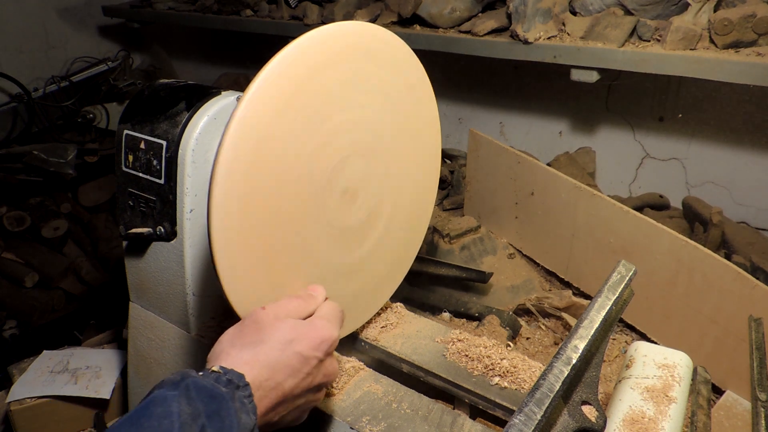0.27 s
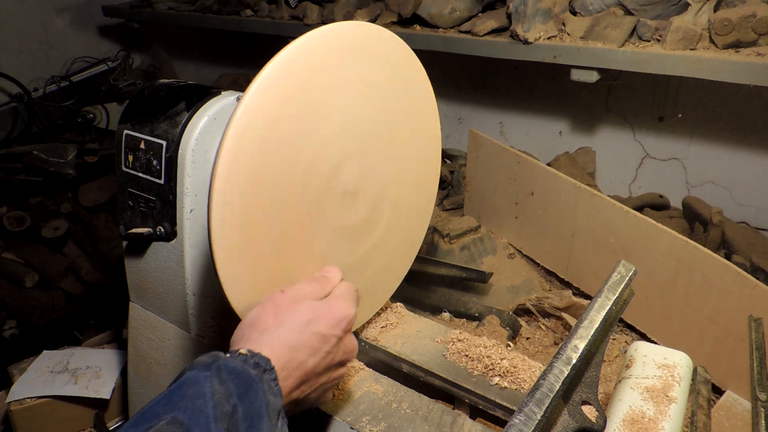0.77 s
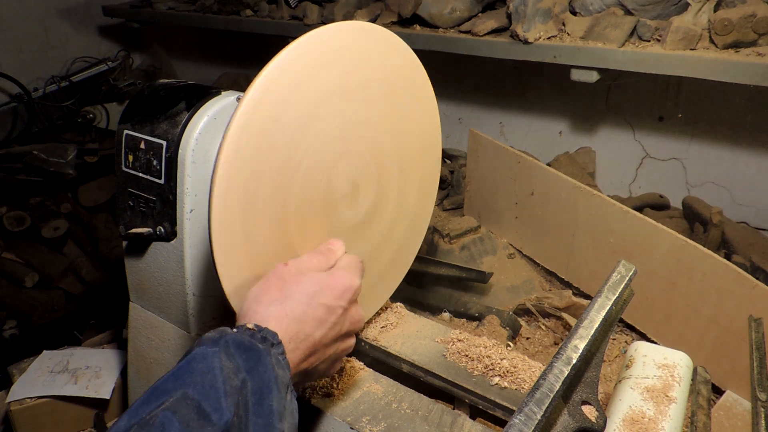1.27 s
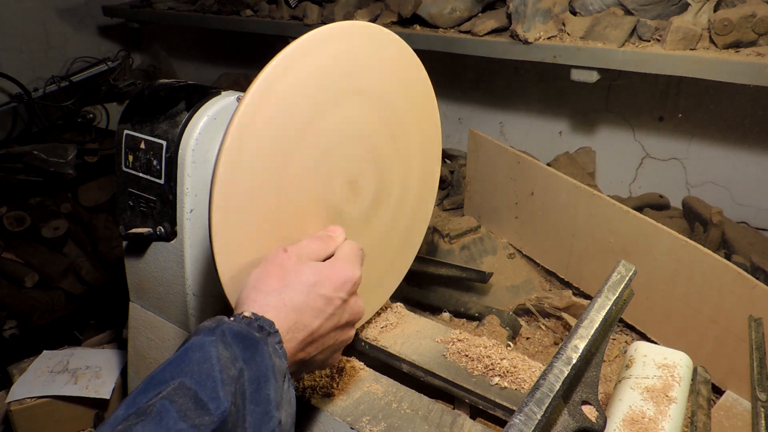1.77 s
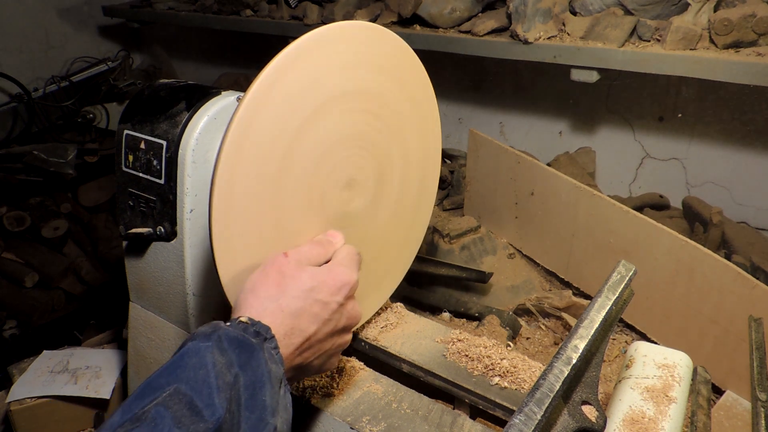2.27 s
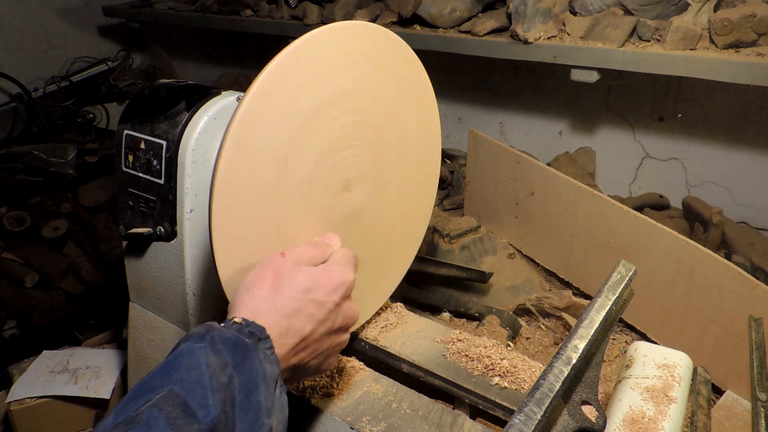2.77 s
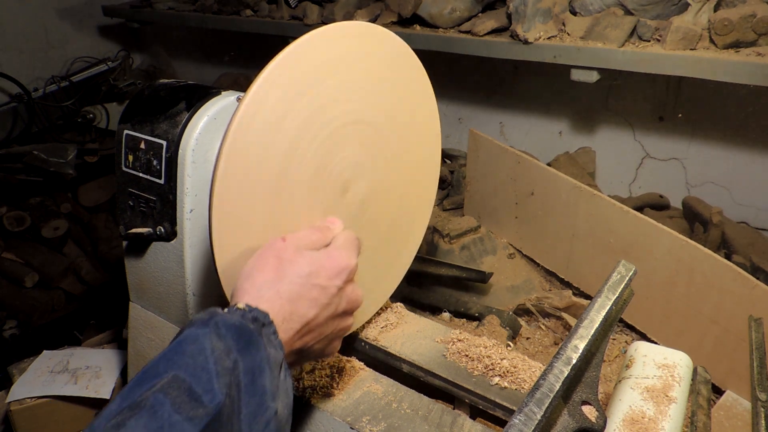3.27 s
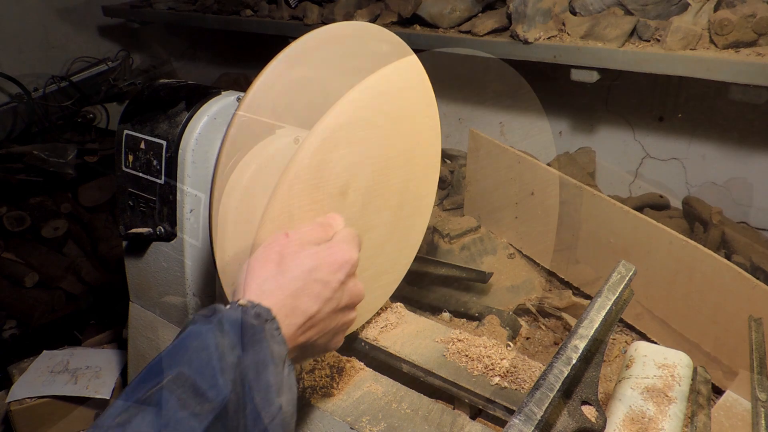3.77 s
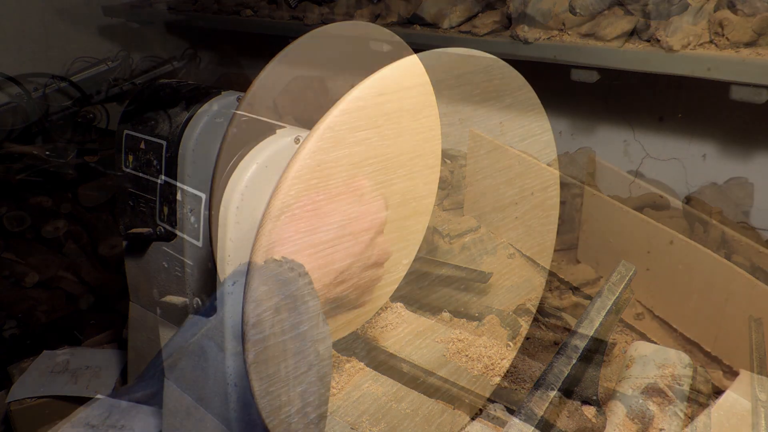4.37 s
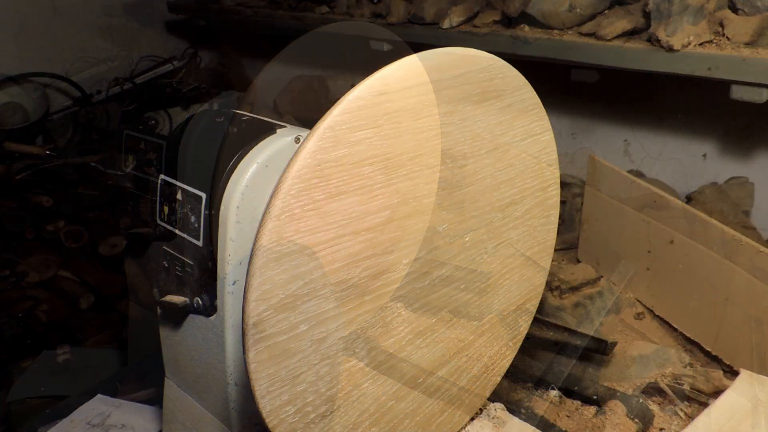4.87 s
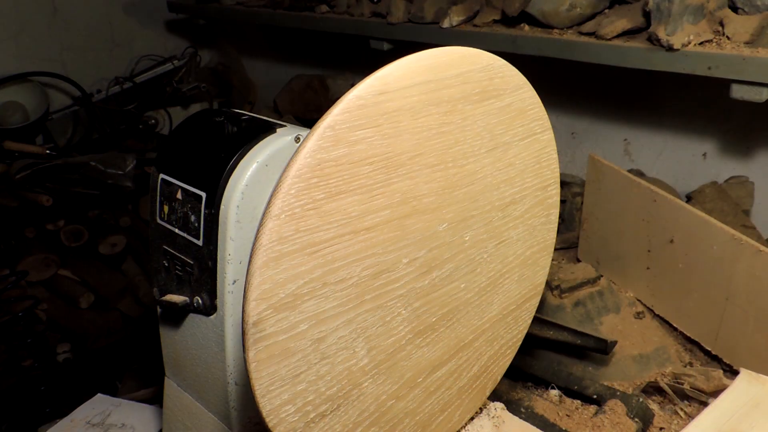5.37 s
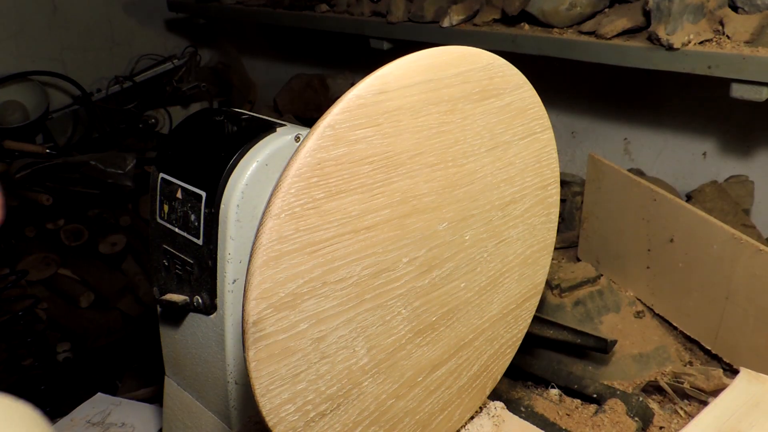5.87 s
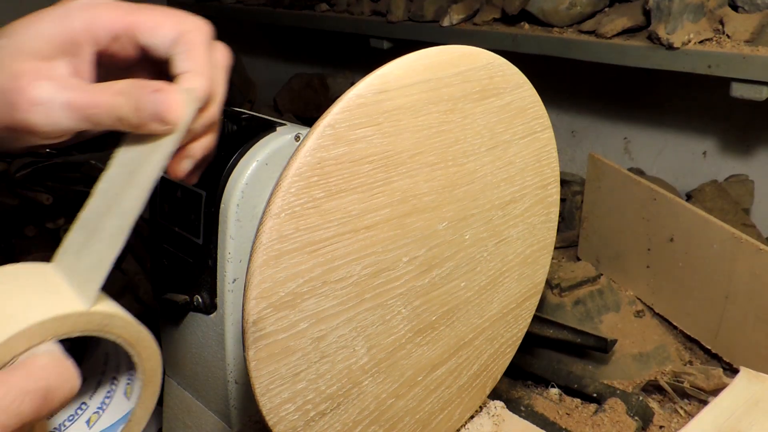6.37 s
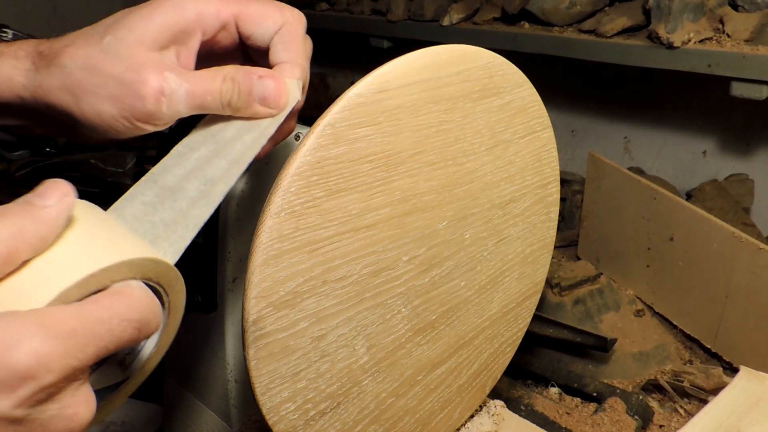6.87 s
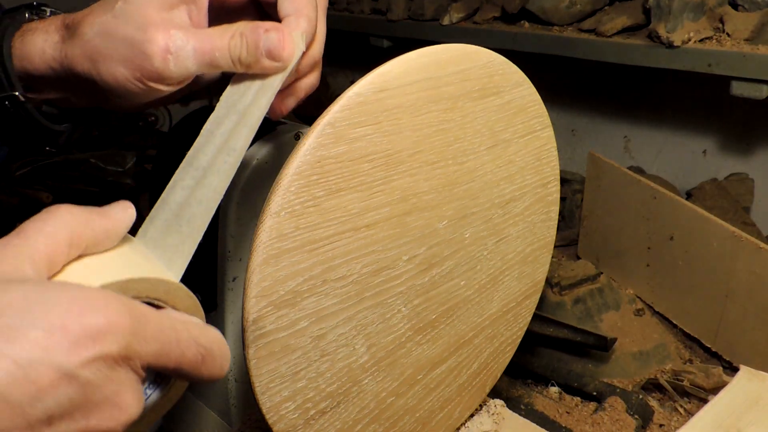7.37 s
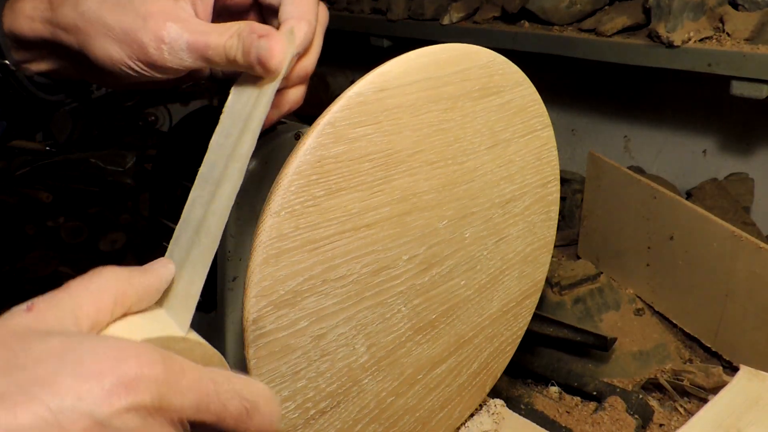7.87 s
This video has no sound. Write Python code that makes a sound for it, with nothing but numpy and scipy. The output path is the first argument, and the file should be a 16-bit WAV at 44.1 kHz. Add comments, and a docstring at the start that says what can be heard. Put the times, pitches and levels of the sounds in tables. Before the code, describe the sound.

From the start, sandpaper on a spinning wooden disc gives a loud, bright, wide hiss, pulsing about sixteen times a second as the grain passes. The hand moves from rim towards centre during the first two seconds, so the colour shifts slightly, with small changes in pressure and a faint woody ringing. A weak motor hum lies underneath. From about 3.5 s the sanding fades smoothly, growing duller and raspier, and is gone by 5.1 s. Quiet room air, low rumble and a faint wavering low drone remain. Soft papery finger slides come around 5.4 to 6.5 s, clearest from 6 s. Tape peels at about 7.0-7.3 s, then again at 7.5-7.7 s: dense, clumpy crackle with a hollow drumming that falls in pitch. Two tiny rubs follow near 8 s. Close stereo microphones, short room reverberation.

```python
"""Sandpaper is held against a wooden disc spinning on a lathe in a small workshop.
Random tiny cuts make a hiss that swells twice a turn, and resonances make the disc ring, over a faint motor hum.
The sanding and the hum fade away, and a steady room sound with a wavering drone takes their place.
Fingers slide softly over a roll of masking tape. Then tape is peeled off in two pulls, made of clumped
random snaps and a drumming strip whose pitch falls. Two last light slides of the fingers follow."""
import sys
import numpy as np
from scipy import signal
from scipy.fft import rfft, irfft
from scipy.io import wavfile
from scipy.ndimage import uniform_filter1d

SR = 44100
rng = np.random.default_rng(int(sys.argv[2]) if len(sys.argv) > 2 else 0)


def inscribe(sig):
    """Save sig as 16-bit PCM at rate SR to the path in sys.argv[1].

    A 1-D sig is mono; a 2-D sig holds one channel per row.
    Samples are clipped to [-1, 1] before scaling.
    """
    pcm = np.round(np.clip(np.atleast_2d(sig).T, -1, 1) * 32767)
    wavfile.write(sys.argv[1], SR, pcm.astype(np.int16))


N = 357651
T = np.arange(N) / SR  # time [s]
HZ = np.maximum(np.arange(N // 2 + 1) * SR / N, 1)  # frequency axis [Hz]

# How alike soft, spread-out sounds are at the two microphones: (frequency [Hz], likeness [0-1])
SPREAD_LIKENESS = [(30, .97), (130, .82), (400, .68), (800, .6), (1500, .38), (3000, .2), (14000, .1)]


def sanding():
    """Grit tears at the wood: a throbbing hiss, and the modes of the disc set ringing."""
    # Spindle speed: (time [s], speed [turns per s])
    spindle_speed = [(0.0, 8.224), (0.6, 8.051), (1.2, 8.249), (2.0, 8.176), (2.8, 8.154), (3.6, 8.175),
                     (4.2, 8.178), (4.6, 8.282), (5.1, 8.139)]
    # The hand bears down (+) or eases off (-): (middle [s], length [s], hiss [dB], flexing [dB])
    leans = [(0.17, 0.19, -2.2, 1.5), (0.42, 0.37, 0.7, 4), (1.05, .24, 0.1, 5.5), (2.427, 0.25, 2, 5),
             (2.68, 0.13, -1, -1), (2.852, 0.18, 0, 5), (3.253, 0.15, 0, 7.5), (3.537, 0.17, -1.5, -1.5),
             (3.797, .16, 1.5, 2), (4.083, 0.36, -2.5, 2.5), (4.73, 0.26, -2.5, 10)]
    # The hand starts near the rim (1 = rim, 0 = centre) and settles towards the centre
    rim_start, slide_s = 0.87, 0.88
    # Levels at the centre, and what each gains at the rim
    hiss_centre_db, hiss_rim_db = -16.0, 1.5
    flex_centre_db, flex_rim_db = -60.5, 12.5

    turns = np.cumsum(in_time(spindle_speed)[0]) / SR
    rim = np.clip(rim_start * np.exp(-T / slide_s), 0, 1)
    hiss_leans = humps((s, length, db) for s, length, db, _ in leans)
    flex_leans = humps((s, length, db) for s, length, _, db in leans)
    hiss_db = hiss_centre_db + hiss_rim_db * rim + hiss_leans
    flex_db = flex_centre_db + flex_rim_db * rim + flex_leans
    hiss = from_db(hiss_db) * grit_hiss(turns, rim)
    ring = disc_ring(turns, rim, hiss_db, flex_db)
    return sanding_share() * (hiss + ring)


def grit_hiss(turns, rim):
    """Countless tiny cuts, coloured by the place of the hand and swelling with the grain."""
    # Colour of the hiss near the rim, then on the face: (frequency [Hz], relative level per Hz [dB])
    rim_colour = [(530, -63), (900, -23.5), (1090, -48), (1160, -19), (1620, -36), (1860, -4.5),
                  (2030, -8.5), (2230, -8), (2560, -23.5), (3410, 4.5), (6050, -4), (7280, 2.5),
                  (8350, 0.5), (11900, 0), (14000, -6)]
    face_colour = [(530, -26), (900, -29.5), (1090, -34.5), (1170, -26), (1300, -22.5), (1390, -17),
                   (1580, -12), (1810, -17), (1940, -11.5), (2900, -3.5), (4190, -3), (5100, 0), (7360, -1),
                   (9050, -1), (14000, -9.5)]
    # The lathe bed, headstock and board throw the hiss back: (delay [s], level [dB])
    nearby = [(.0019, -44), (.0034, -24), (.0057, -16), (.0088, -16.5)]
    # How alike the hiss is at the two microphones: (frequency [Hz], likeness [0-1])
    hiss_likeness = [(30, .97), (130, .9), (600, .98), (1400, .93), (2400, .72), (3300, .52), (5000, .38),
                     (8000, .2), (14000, .26)]
    # Boost of the low rasp, then of the top fizz: (time [s], level [dB])
    rasp = [(.35, 1), (.8, -5.5), (1.65, -4), (2.05, 1.3), (3.8, 1.5), (4.3, 7), (5.1, 14.5)]
    fizz = [(0, 5.5), (.2, 3.5), (1.9, 1.5), (3.0, 3)]
    # The hollow between hand and disc: (frequency [Hz], width [Hz], level [dB], left over right [dB])
    hollow_modes = [(5140, 790, -12.5, 17.5), (9070, 340, -16, -13), (10340, 1300, -7, -5),
                    (12100, 1300, -13, 12)]
    # Overall tilt of the hiss, weaker at the bottom and brighter on top: (frequency [Hz], relative level [dB])
    hiss_tilt = [(300, -16), (900, -1.5), (1800, -1.5), (3000, -1), (7000, 0), (10000, 1.5), (14000, 2)]

    cuts = grains(per_s=20000, spread_db=1.47)
    cuts = cuts + sum(from_db(db) * np.roll(cuts, int(delay * SR), axis=1) for delay, db in nearby)
    grit = microphones(cuts, hiss_likeness, slant=0.87)
    hiss = rim * colour(grit, rim_colour) + (1 - rim) * colour(grit, face_colour)
    # A flatter hand rasps lower, and cups a hollow over the paper
    hiss = hiss + (from_db(in_time(rasp)[0]) - 1) * resonate(hiss, 1550, 1050)
    hiss = hiss + (from_db(in_time(fizz)[0]) - 1) * resonate(hiss, 13300, 2900)
    hollow = 0
    for hz, width, db, side_db in hollow_modes:
        hollow = hollow + from_db(db + 1.5 * drift(3.94)) * pan(side_db) * resonate(hiss, hz, width)
    hiss = hiss + (1 - rim) * hollow
    # The patch in contact keeps shifting under the fingers, and the colour with it
    bands = np.geomspace(2000, 13000, num=9)
    hiss = hiss + sum(0.13 * drift(22.08) * resonate(hiss, hz, hz / 7) for hz in bands)
    # The swell is a little shallower at the rim, and flattens as the sanding dies away
    half_depth_db = (4.5 - 1.5 * rim) * sanding_share() ** .25
    bite = swell(turns, 0.013, half_depth_db, wobble_db=0.53 + 0.7 * rim)
    unevenness = from_db(0.16 * drift(24.54) + 0.53 * drift(180))
    return colour(hiss, hiss_tilt) * bite * unevenness


def disc_ring(turns, rim, hiss_db, flex_db):
    """The wood rings at its own pitches, each mode scraped hardest at its own places in the turn."""
    # Disc modes: (frequency [Hz], width [Hz], relative level [dB], extra at the rim [dB],
    # place of the swell [turns])
    disc_modes = [(404, 28, -8.5, -0.5, 0.34), (714.7, 16.8, 1, 2.5, 0.24), (1031, 40, -7, 0, 0.43),
                  (1163, 28, -2.5, -1.5, 0.31), (1423, 76, 0.5, 8, 0.51), (1634, 16, -2, -3, 0.78),
                  (1710, 11.5, 2, 2.5, 0.34), (1790, 20, -1, 6, 0.21), (1915, 23, 2, 19, 0.46),
                  (2358, 59, 9.5, -5.5, 0.3), (2640, 17, -12, 0, 0.23), (3500, 21, 10.5, 4, 0.19),
                  (3717, 31, 14, -4, 0.24)]
    scrape_db = -41.5  # ringing of the higher modes, relative to the hiss

    # The whole disc flexes as freely as the hand lets it; the higher modes follow the bite of the grit
    flexing = from_db(flex_db)
    scraping = from_db(hiss_db + scrape_db)
    disc = 0
    for hz, width, db, rim_db, place in disc_modes:
        bite = swell(turns, place - .04, half_depth_db=4.5, wobble_db=0.53 + 2.5 * rim)
        scrape = rng.standard_normal(N) * bite
        mode = rms_one(resonate(resonate(scrape, hz, width), hz, width * 5))
        drive = flexing if hz < 900 else scraping
        disc = disc + mode * drive * from_db(db + rim_db * rim)
    return disc


def swell(turns, place, half_depth_db, wobble_db):
    """The paper bites across the grain twice a turn; disc run-out, larger at the rim, favours one bite."""
    angle = 2 * np.pi * (turns - place)
    twice_a_turn = 2 * np.abs(np.cos(angle)) ** 1.05
    gain = from_db(half_depth_db * twice_a_turn + wobble_db * np.cos(angle))
    # Keep the mean power over about two turns at 1
    two_turns = int(2 * N / turns[-1])
    return gain / np.sqrt(uniform_filter1d(gain ** 2, size=two_turns))


def sanding_share():
    """1 while the sanding is fully heard, falling to 0 as it fades away."""
    fade_start_s, fade_end_s, fade_curve = 3.52, 5.15, 1.14
    return np.interp(T, [fade_start_s, fade_end_s], [1, 0]) ** fade_curve


def tape():
    """Threads of glue snap in clumps as the tape leaves the roll, and the taut strip drums with them."""
    # Tugs; the first two run into one pull: (full force at [s], rise [s], hold [s], fall [s], crackle [dB])
    tugs = [(7.035, .12, .055, .05, -32), (7.175, .07, 0.0501, .13, -31.5),
            (7.515, 0.0457, .125, .062, -32)]
    # Colour of the snaps: (frequency [Hz], relative level per Hz [dB])
    snap_colour = [(410, -30), (700, -3.5), (958, -13.5), (1450, -7.5), (1960, -7), (2510, -4),
                   (3480, -3.5), (3950, -2), (4260, -7), (4650, -0.5), (5400, -4.5), (5750, -1),
                   (14000, -1)]
    # How alike the close snaps are at the two microphones: (frequency [Hz], likeness [0-1])
    snap_likeness = [(400, .94), (1400, .75), (3000, .45), (6000, .32), (14000, .32)]
    # The cardboard roll rings faintly: (frequency [Hz], width [Hz], level [dB])
    roll_modes = [(3120, 160, -9), (3950, 120, -22), (4570, 230, -15), (5640, 190, -12)]
    # Modes of the taut strip: (multiple of its pitch, half width [Hz], relative level [dB])
    strip_modes = [(1, 88, 0.5), (3.5, 170, -3.5), (5.1, 220, -8.5)]
    # Pitch at first, and length gained over all the tugs as a share of the first length
    strip_start_hz, strip_growth = 538.5, 0.68
    # Drumming before the mode levels, at the hardest tug, and its change in dB per dB of pull
    strip_db, strip_follows = -46, 1.64

    forces = [from_db(db) * stroke(s, rise, hold, fall) for s, rise, hold, fall, db in tugs]
    pull = np.sqrt(sum(force ** 2 for force in forces))
    # The free strip drums lower as the tugs lengthen it
    strip_hz = strip_start_hz / (1 + strip_growth * np.cumsum(pull) / np.sum(pull))

    glue = microphones(grains(per_s=5000, spread_db=1.5), snap_likeness, slant=1.38)
    snaps = colour(glue, snap_colour)
    snaps = snaps + sum(from_db(db) * resonate(snaps, hz, width) for hz, width, db in roll_modes)
    # The longer and lower the strip, the more its backing sizzles
    length = np.clip(450 / strip_hz, 0, 1.5)
    snaps = rms_one(snaps + 0.27 * length ** 2 * resonate(snaps, 12300, 4000))
    clumps = from_db(1.16 * drift(70) + 1.3 * drift(450))
    crackle = snaps * clumps * pull

    angle = 2 * np.pi * np.cumsum(strip_hz) / SR
    drum = 0
    for multiple, half_width_hz, db in strip_modes:
        # Slow random flutter on a tone gives a narrow band of noise that follows the strip's pitch
        low_pass = signal.butter(2, half_width_hz, fs=SR, output="sos")
        flutter = signal.sosfilt(low_pass, grains(per_s=1500, spread_db=4.5))
        band = flutter[0] * np.cos(multiple * angle) + flutter[1] * np.sin(multiple * angle)
        drum = drum + from_db(db) * rms_one(band)
    drum_gain = from_db(strip_db) * (pull / pull.max()) ** strip_follows
    return crackle * pan(1.6) + drum * drum_gain * pan(3.0)


def handling():
    """Soft friction of skin on paper tape, made of many tiny snaps."""
    # Fingers slide on the roll and the tape: (loudest at [s], rise [s], fall [s], level [dB])
    slides = [(5.36, .2, 0.13, -52.5), (5.7, 0.09, 0.23, -53), (5.98, 0.089, 0.046, -45),
              (6.25, 0.093, 0.19, -43.5), (6.51, 0.074, 0.16, -43.5), (7.95, 0.055, .07, -54),
              (8.055, 0.04, 0.03, -46.5)]
    # Colour of the friction: (frequency [Hz], relative level per Hz [dB])
    finger_colour = [(300, -6), (700, -4), (1100, 2.5), (1800, -1.5), (3000, -2.5), (5000, 0), (8000, 0),
                     (11000, 2.5), (14000, -5)]

    rubbing = microphones(grains(per_s=12000, spread_db=-0.5), SPREAD_LIKENESS, slant=1)
    friction = colour(rubbing, finger_colour)
    strokes = [from_db(db) * stroke(s, rise, 0, fall) for s, rise, fall, db in slides]
    sliding = np.sqrt(sum(one ** 2 for one in strokes))
    return friction * sliding * from_db(0.88 * drift(40)) * pan(3.1)


def workshop():
    """Noise for room air and a low rumble, and sines for the motor hum and the drone that takes over."""
    # Colour of the room air, then of the rumble: (frequency [Hz], relative level per Hz [dB])
    air_colour = [(41, -57), (70, -2), (232, -8.5), (353, -6.5), (395, -10), (526, -8.5), (734, -10.5),
                  (1090, -10.5), (1340, -14.5), (1670, -14), (2030, -16), (6740, -21), (14000, -20.5)]
    rumble_colour = [(15, -4), (25, 2.5), (36, 0), (50, -0.5), (60, -8), (75, -24), (120, -27), (300, -66)]
    # Motor hum, around which each tone wavers: (frequency [Hz], level [dB])
    hum = [(48.4, -69), (156.1, -73.5)]
    # The rumble swells now and then: (middle [s], length [s], height [dB])
    rumble_swells = [(0.1, .6, 6), (5.34, .2, 8), (8.08, 0.55, 7)]
    # Background while sanding and afterwards
    air_db, still_air_db = -62, -50.5
    rumble_level_db, still_rumble_db = -59.5, -57

    running = sanding_share()
    still = 1 - running
    air_gain = np.hypot(running * from_db(air_db), still * from_db(still_air_db))
    air = colour(microphones(rng.standard_normal((3, N)), SPREAD_LIKENESS, slant=0.033), air_colour)

    rumble_db = running * rumble_level_db + still * still_rumble_db + humps(rumble_swells)
    # Mostly the same on both sides, with a little of its own on each
    rumble = colour(rng.standard_normal(N), rumble_colour)
    rumble = rumble + 0.23 * colour(rng.standard_normal((2, N)), rumble_colour)

    motor = 0
    for hz, db in hum:
        tone = np.sqrt(2) * np.sin(2 * np.pi * hz * T + 0.26 * drift(4.4))
        motor = motor + from_db(db + 1.4 * drift(8.7)) * tone
    drone = from_db(-60.0 + 2.3 * drift(4.4)) * np.sin(2 * np.pi * 48.4 * T + .5 * drift(3))
    return pan(0.43) * (air_gain * air + from_db(rumble_db) * rumble + running * motor + still * drone)


def walls(x, t60, wet_db):
    """Short, cluttered reverberation: noise dying away by 60 dB in t60 seconds, different at each side."""
    t = T[:SR // 3]
    tail = rng.standard_normal((2, len(t))) * from_db(-60 * t / t60) * (t > .004)
    tail /= np.sqrt(np.sum(tail ** 2, axis=1, keepdims=True))
    return x + from_db(wet_db) * signal.fftconvolve(x, tail, axes=1)[:, :N]


def microphones(streams, likeness, slant):
    """The first stream reaches both sides directly, the others are scattered to one side each."""
    # Phase by which the left leads: (frequency [Hz], lead [radians at slant 1])
    left_lead = [(30, 0), (2000, 0), (3000, .3), (5500, .7), (8500, 1.5), (12000, 2.6), (14000, 2.7)]
    direct, *scattered = rfft(streams)
    alike = np.clip(at_hz(likeness), 0, 1)
    turn = np.exp(.5j * slant * at_hz(left_lead) * np.array([[1], [-1]]))
    return irfft(np.sqrt(alike) * direct * turn + np.sqrt(1 - alike) * np.array(scattered), N)


def grains(per_s, spread_db):
    """Three unrelated streams of tiny snaps at random moments, of uneven size; rms 1."""
    sizes = from_db(spread_db * np.minimum(rng.exponential(1, (3, N)), 5))
    happens = rng.random((3, N)) < per_s / SR
    return rms_one(happens * sizes * rng.choice([-1, 1], (3, N)))


def resonate(x, hz, width_hz):
    """Two-pole resonance with gain 1 on top."""
    r = np.exp(-np.pi * width_hz / SR)
    feed = np.array([1, 0, -1]) * (1 - r * r) / 2
    return signal.lfilter(feed, [1, -2 * r * np.cos(2 * np.pi * hz / SR), r * r], x)


def colour(x, spectrum):
    """Give a sound a spectrum; rms 1."""
    return rms_one(irfft(rfft(x) * from_db(at_hz(spectrum)), N))


def at_hz(points):
    """A spectrum table on the frequency axis."""
    hz, value = np.transpose(points)
    return np.interp(np.log(HZ), np.log(hz), value)


def in_time(rows):
    """One curve over time per column of a table."""
    s, *columns = np.transpose(rows)
    return [np.interp(T, s, c) for c in columns]


def humps(rows):
    """Sum of bell curves, one per (middle, length at half height, height)."""
    return sum(height * .5 ** ((2 * (T - s) / length) ** 2) for s, length, height in rows)


def stroke(s, rise_s, hold_s, fall_s):
    """One movement of the hand: exponential rise to 1 at s, hold, exponential fall."""
    rise = np.minimum((T - s) / rise_s, 0)
    fall = np.minimum((s + hold_s - T) / fall_s, 0)
    return np.exp(np.maximum(rise + fall, -20))


def drift(rate):
    """Slow random wander of spread about 1, with a new target rate times a second."""
    knots = rng.standard_normal(2000)
    return np.interp(T * rate, np.arange(len(knots)), knots) * np.sqrt(3 / 2)


def pan(db):
    """Left and right gains for a level difference (left louder when positive)."""
    return from_db(np.array([[db], [-db]]) / 2)


def rms_one(x):
    """Scale to rms 1."""
    return x / np.sqrt(np.mean(x ** 2) + 1e-20)


def from_db(db):
    """Decibels to gain."""
    return 10 ** (np.asarray(db) / 20)


def scene():
    """Sanding, then tape, with echoes from the walls, over the sound of the workshop."""
    return walls(sanding() + handling() + tape(), t60=0.14, wet_db=-20) + workshop()


def record(dry):
    """The tallest peaks are rounded, and the top is cut steeply."""
    cutoff_hz = 14250
    rounded = dry / (1 + (dry / .85) ** 6) ** (1 / 6)
    low_pass = signal.ellip(10, .05, 60, cutoff_hz, fs=SR, output="sos")
    return signal.sosfiltfilt(low_pass, rounded)


dry = scene()
out = record(dry)
inscribe(out)
```